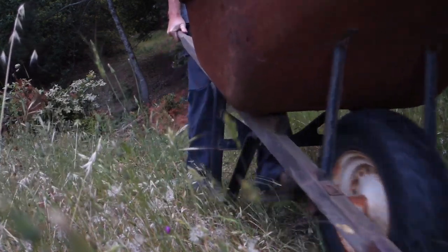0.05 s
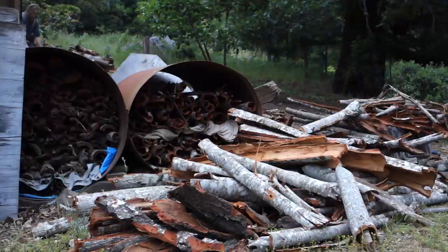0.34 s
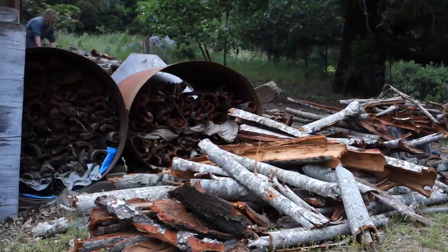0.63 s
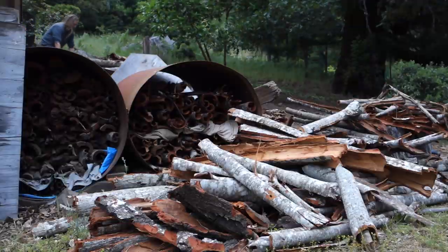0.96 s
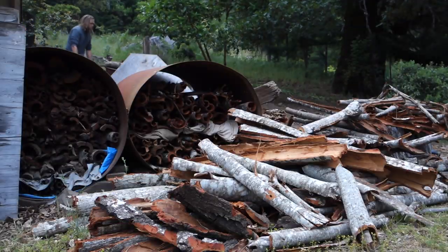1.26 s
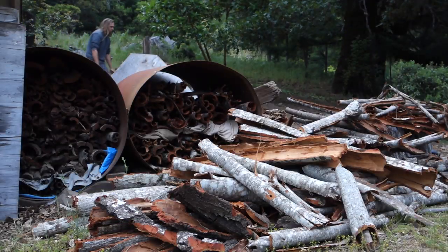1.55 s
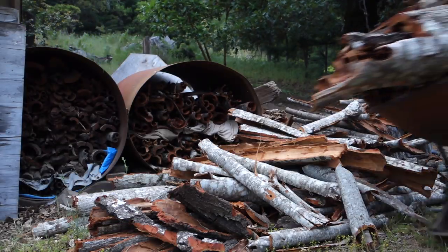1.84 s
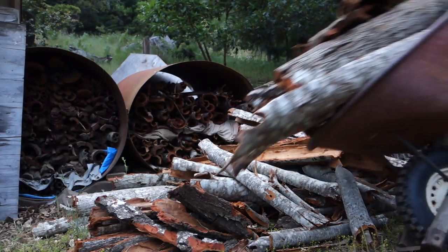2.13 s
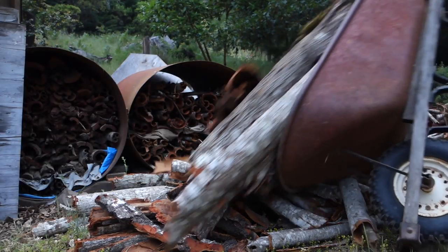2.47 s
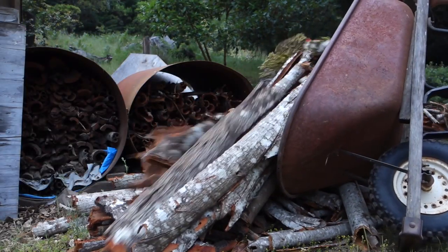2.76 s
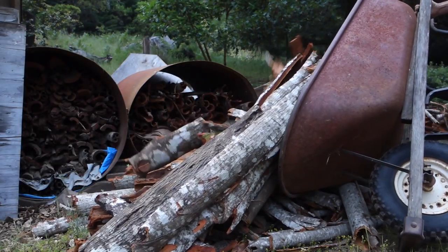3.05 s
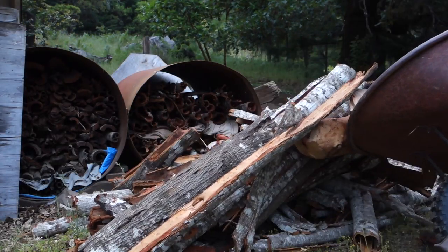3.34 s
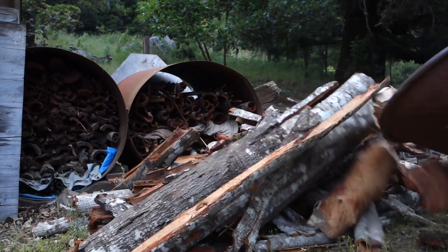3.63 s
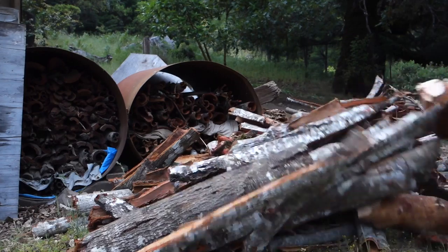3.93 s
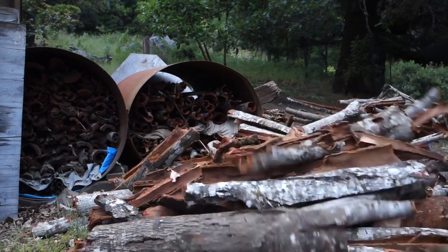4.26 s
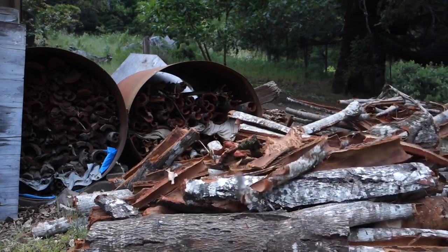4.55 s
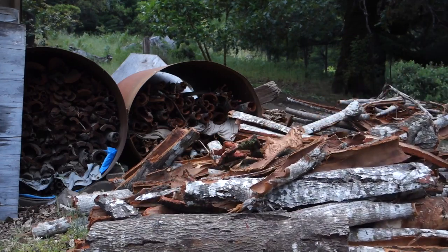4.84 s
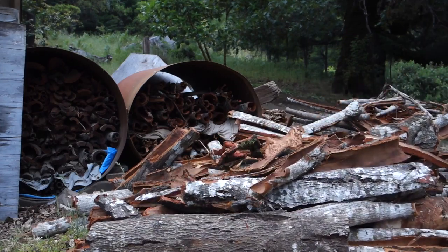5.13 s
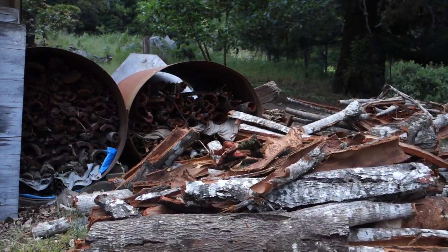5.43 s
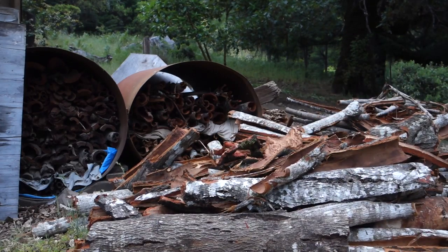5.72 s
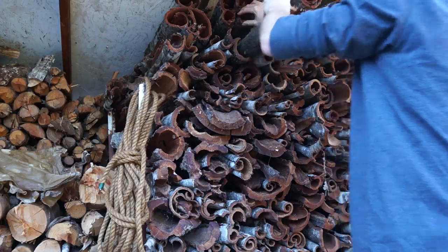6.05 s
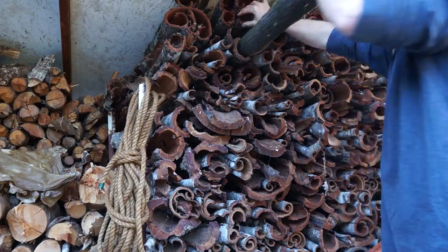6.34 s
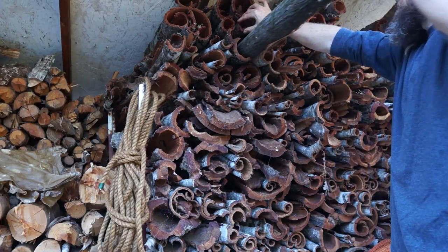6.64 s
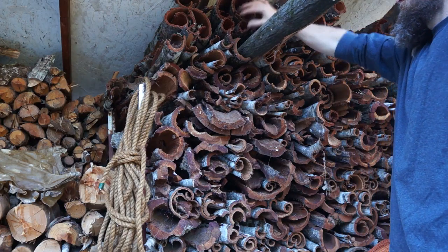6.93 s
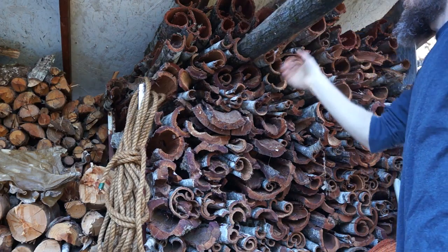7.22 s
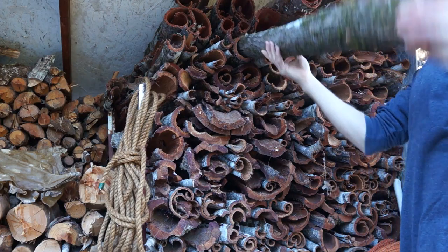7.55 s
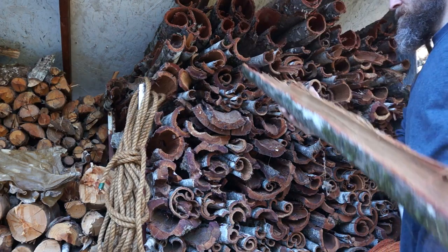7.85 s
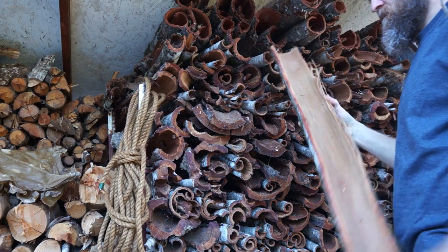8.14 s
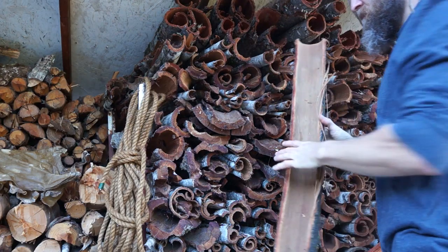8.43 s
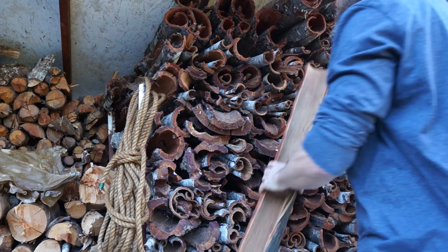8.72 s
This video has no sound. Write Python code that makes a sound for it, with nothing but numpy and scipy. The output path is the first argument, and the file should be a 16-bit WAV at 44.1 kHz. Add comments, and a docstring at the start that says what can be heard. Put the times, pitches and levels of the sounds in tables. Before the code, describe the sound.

A wheelbarrow rolls quietly through grass, jolting and squeaking, then dumps its load nearby: dry bark tumbles down with woody clacks, heavy thuds and a ringing rattle from the steel tray. After it settles, the place changes to a softly hissing shed. One hollow curl of bark sticks and slips as it is pulled from a stack in scraping tugs, and it ends with tiny snaps and hands brushing the bark.

```python
"""Tipping and pulling dry bark

A steel wheelbarrow bumps and squeaks over grass and tips a load of dry curled bark: slabs slide,
clatter and thud onto a pile, and the emptying tray drums and jingles. Then, in a hissing woodshed,
one long curl is dragged out of a stack of hollow ones, sticking and slipping, and hands brush it.
Scraping is made of many tiny slips; each blow is a short noise plus a few dying tones."""
import sys
import numpy as np
from scipy import signal
from scipy.fft import rfft, irfft, next_fast_len
from scipy.io import wavfile
from scipy.ndimage import uniform_filter1d, map_coordinates

SR = 44100
rng = np.random.default_rng(int(sys.argv[2]) if len(sys.argv) > 2 else 0)


def waveform_to_disk(signal):
    """Save audio, clipped to [-1, 1], as 16-bit WAV at the path in sys.argv[1]."""
    frames = np.transpose(np.atleast_2d(signal))
    scaled = np.clip(frames, -1, 1) * 32767
    samples = np.round(scaled).astype(np.int16)
    wavfile.write(sys.argv[1], SR, samples)


N = 391608

# dry edges clack, snap and slip: (time [s], relative level [dB], pitch [Hz])
EDGE_HITS = [(0.919, -28.5, 2770), (2.049, -21.5, 1420), (2.212, -25, 1690), (2.687, -6, 2000),
             (2.784, -4, 904), (2.817, -5, 3110), (2.851, -5.5, 950), (2.943, -0.5, 1850),
             (3.44, -17, 1080), (3.688, 1.5, 1073), (3.701, 1.5, 1063), (3.804, -4.5, 920),
             (3.915, -8, 1160), (3.945, -3.5, 1240), (4.002, -10, 1150), (4.091, -17, 940),
             (4.185, -1.5, 1070), (4.259, -10, 1176), (4.411, 1.5, 1018), (6.37, 4.5, 1490),
             (6.381, -2, 1410), (6.409, 1, 1105), (6.419, 3, 1543), (6.519, -1.5, 1940), (6.608, -8, 1750),
             (6.644, 1.5, 1880), (6.657, -1, 1170), (6.707, 2, 1910), (6.757, -5.5, 1290),
             (6.859, -1, 1220), (6.878, -5.5, 1197), (6.911, -3.5, 2730), (6.95, -8, 1233),
             (7.355, -8, 1300), (7.452, -10.5, 1750), (7.525, 4, 1354), (7.538, -0.5, 1610),
             (7.56, 0, 1580), (8.165, -17, 1380)]
# tones of the steel tray: (pitch [Hz], level [dB], fade time [s])
TRAY_TONES = [(120.4, 5, 0.25), (153.8, 4, 0.3), (204.7, 4, 0.3), (239.6, 7.5, 0.45), (289, -5, 0.41),
              (352, -14, 1.0), (443, -7, 0.3), (529, 3, 0.2), (643, -9, 0.25)]
# where the thin walls of a curl ring: (pitch [Hz], width [Hz], level [dB])
WALL_TONES = [(866, 57, 11), (1070, 62, -2), (1224, 100, 2), (1570, 98, 1), (1767, 43, 1.5), (1970, 48, 0),
              (2670, 71, -0.5), (3500, 890, -12)]
# tone colours of low rumbling, heavy slabs and crisp crackling: (frequency [Hz], level [dB])
RUMBLE_COLOUR = [(60, -37.5), (180, -4), (350, -5), (600, -1.5), (900, -13), (1500, -25), (4000, -59.5)]
SLAB_COLOUR = [(30, -23), (80, -10.5), (130, 5.5), (260, 3), (400, -1.5), (650, -7.5), (1200, -32.5),
               (3000, -46)]
CRACKLE_COLOUR = [(2000, -14), (5000, 4.5), (8500, 2.5), (12000, -1), (16000, -10.5)]


def amp(db):
    """Turn decibels into a number to multiply by."""
    return 10 ** (np.asarray(db) / 20)


def unit(x):
    """Scale a sound to an average strength (rms) of 1."""
    return x / np.sqrt(np.mean(x ** 2) + 1e-20)


def steady(x, size=3500):
    """Even out slow changes to a strength of 1, keeping the fine grain."""
    power = uniform_filter1d(uniform_filter1d(x ** 2, size), size)
    return x / np.sqrt(np.abs(power) + 1e-4 * np.mean(x ** 2))


def strike(x):
    """Scale a blow so that its loudest 3 ms have a strength of 1."""
    return x / np.sqrt(uniform_filter1d(x ** 2, 128).max() + 1e-20)


def add(track, s, sound):
    """Mix a sound into a track at s seconds."""
    start = max(0, round(s * SR))
    track[start:start + len(sound)] += sound[:N - start]


def wobble(rate):
    """A smooth random curve through rate points a second."""
    return map_coordinates(rng.standard_normal(int(N * rate / SR) + 4), [np.arange(N) * rate / SR])


def glide(times, values):
    """Join points with straight lines, one value per sample."""
    return np.interp(np.arange(N) / SR, times, values)


def during(times):
    """True from the first time to the last."""
    t = np.arange(N) / SR
    return (t >= times[0]) & (t <= times[-1])


def swells(starts, rises, holds, levels_db, t60):
    """Strength of overlapping movements: each rises, holds, then fades by 60 dB in t60 seconds."""
    power, t = np.zeros(N), np.arange(3 * SR // 2) / SR
    for s, rise, hold, db in np.broadcast(starts, rises, holds, levels_db):
        fading = amp(db - 60 * np.maximum(t - rise - hold, 0) / t60)
        add(power, s, (np.clip(t / rise, 0, 1) * fading) ** 2)
    return np.sqrt(power)


def ring_time():
    """Sample times for one blow: half a second."""
    return np.arange(SR // 2) / SR


def through(x, response):
    """Play x through an object, given the object's answer to one tap."""
    return signal.oaconvolve(x, response)[:len(x)]


def colour(x, spectrum, size=4096):
    """Filter x to follow (frequency [Hz], level [dB]) points."""
    hz, db = np.transpose(spectrum)
    gain = amp(np.interp(np.log(np.fft.rfftfreq(size, 1 / SR) + 1), np.log(hz), db))
    cepstrum = irfft(np.log(gain))
    cepstrum[1:size // 2] *= 2  # folded so the filter rings only after a sound, never before
    cepstrum[size // 2 + 1:] = 0
    return through(x, irfft(np.exp(rfft(cepstrum))))


def hump(hz, below_db, above_db):
    """A tone colour that peaks at hz, with the given levels two octaves below and above."""
    return [(hz / 16, 3 * below_db), (hz / 4, below_db), (hz, 0),
            (hz * 4, above_db), (hz * 32, 3 * above_db)]


def resonator(peaks):
    """How an object answers one tap: the wider a peak, the sooner its tone dies."""
    t = ring_time()
    return sum(amp(db) * width * np.exp(-np.pi * width * t) * np.sin(2 * np.pi * hz * t)
               for hz, width, db in peaks)


def ring(tones):
    """A blow sets off dying tones, each with a slightly random strength."""
    t = ring_time()
    return sum(rng.choice([-1, 1]) * amp(db + rng.normal(0, 3) - 60 * t / t60)
               * np.sin(2 * np.pi * hz * t) for hz, db, t60 in tones)


def burst(t60):
    """Dying noise: the many crowded tones of an uneven piece."""
    t = ring_time()
    return rng.standard_normal(len(t)) * amp(-60 * t / t60)


def pieces(x, patchy_db):
    """As the contact passes from piece to piece, narrow bands of sound come and go."""
    bands = signal.stft(x, nperseg=512)[2]
    patches = uniform_filter1d(rng.standard_normal(bands.shape), size=2, axis=0)  # blur in pitch
    patches = uniform_filter1d(patches, size=22, axis=1)  # blur in time
    return signal.istft(bands * amp(patchy_db * unit(patches)), nperseg=512)[1][:N]


def friction(spectrum, rate, spread_db, t60, jerk_db, jerk_rate, patchy_db=4.0):
    """Rubbing: rate tiny slips a second, uneven in size and coming in jerks, each ringing briefly."""
    slips = rng.random(N) < rate / SR
    sizes = amp(spread_db * np.clip(rng.standard_normal(N), -2, 2) + jerk_db * wobble(jerk_rate))
    energy = signal.lfilter([1], [1, -amp(-60 / t60 / SR) ** 2], slips * sizes ** 2)
    grains = pieces(np.sqrt(energy) * rng.standard_normal(N), patchy_db)
    return steady(colour(grains, spectrum), size=2200)


def sweep(x, centre_hz, boost_db):
    """Lift a broad band of sound that follows the moving contact."""
    hz, s, bands = signal.stft(x, SR, nperseg=256)
    centre = np.interp(s * SR, np.arange(N), centre_hz)
    octaves_away = np.log2((hz[:, None] + 1) / centre)
    bands = bands * amp(boost_db * np.exp(-octaves_away ** 2))
    return steady(signal.istft(bands, SR, nperseg=256)[1][:N], size=2200)


def lull(depth_db, hold):
    """Just before each clack the piece is stuck or in the air, so its scraping dips."""
    t, waiting = np.arange(N) / SR, np.zeros(N)
    for s, _, _ in EDGE_HITS:
        waiting[np.searchsorted(t, s - hold):np.searchsorted(t, s)] = 1
    return amp(-depth_db * uniform_filter1d(waiting, size=128))


def air(spectrum, side):
    """Steady air, alike in both ears in the bass and wider in the treble."""
    middle, wide = (unit(colour(rng.standard_normal(N), spectrum)) for channel in range(2))
    wide = colour(wide, side)
    return np.array([middle + wide, middle - wide])


def rolling():
    """The tray rumbles as the barrow jolts along, and the tyre parts the grass."""
    # how hard the barrow jolts: (time [s], relative level [dB])
    jolting = [(0, -24.5), (0.14, -40.5), (0.33, -39.5), (0.62, -55), (1.1, -55), (1.32, -46),
               (1.64, -43.5), (1.8, -48), (2.06, -39)]
    # tufts of grass: (start [s], rise [s], hold [s], level [dB], pitch [Hz])
    tufts = [(0, .005, 0.056, -40.5, 1200), (0.08, .02, .11, -44.5, 2210), (0.317, .02, 0.035, -47, 1640),
             (0.884, .04, 0.023, -42, 2530), (0.998, .02, 0.024, -46.5, 3500),
             (1.14, .13, 0.15, -42.5, 1790)]
    # tone colour of grass: (frequency [Hz], level [dB])
    grass_colour = [(300, -10), (800, -3), (2600, -4.5), (5000, -10.5), (9000, -16), (16000, -20.5)]
    times, jolt_db = np.transpose(jolting)
    jolts = amp(glide(times, jolt_db))
    s, rise, hold, db, hz = np.transpose(tufts)
    rumble = friction(RUMBLE_COLOUR, rate=310, spread_db=0.5, t60=0.043, jerk_db=3, jerk_rate=34)
    grass = friction(grass_colour, rate=3000, spread_db=4, t60=0.025, jerk_db=1.8, jerk_rate=38,
                     patchy_db=2.2)
    grass = sweep(grass, glide(s + rise, hz), boost_db=3.5)
    swish = amp(-6.5) * jolts + swells(s, rise, hold, db, t60=0.57)
    return (amp(1.5) * jolts * rumble + swish * grass) * during(times)


def thuds():
    """A landing slab booms at its own pitch, shakes the pile and sets the tray humming."""
    # slabs land or hit the tray: (time [s], relative level [dB], pitch [Hz])
    landings = [(0.083, -24, 185), (0.45, -21.5, 149), (2.099, -9.5, 124), (2.27, -3.5, 258.8),
                (2.783, 1, 291), (2.796, -5, 190.4), (3.08, -6, 266), (3.109, -9.5, 144), (3.442, -3, 145),
                (3.469, -3.5, 132), (3.572, -3, 128), (3.611, -16, 123), (3.915, -5.5, 180),
                (4.16, -3.5, 240.5), (4.412, -8.5, 168), (4.46, -7.5, 129), (4.799, -3, 183),
                (4.879, -5.5, 197), (5.458, -20, 324)]
    x, t = np.zeros(N), ring_time()
    for s, db, hz in landings:
        boom = np.sin(2 * np.pi * hz * t) * amp(-60 * t / 0.32)
        boom += 0.18 * ring([(1.9 * hz, 0, 0.13), (2.8 * hz, -3, 0.09)])
        pile = strike(colour(burst(0.26), hump(hz, -12.5, -18)))
        tray = strike(ring(TRAY_TONES))
        add(x, s, amp(db - 6.5) * strike(boom + pile + 0.67 * tray))
    return x


def knocks():
    """A hollow piece answers a blunt blow with a few close, quickly dying tones."""
    # blows on hollow bark: (time [s], level [dB], pitch [Hz])
    blows = [(0.086, -23, 330), (2.51, -29, 720), (2.68, -14, 520), (3.438, -11.5, 794), (4.187, -18, 718),
             (4.411, -21, 656), (6.736, -18, 205), (7.077, -16.5, 375)]
    x = np.zeros(N)
    for s, db, hz in blows:
        tube = ring([(0.66 * hz, -5, 0.11), (hz, 0, 0.11), (1.13 * hz, -3, 0.1),
                     (1.52 * hz, -4, 0.09), (1.9 * hz, -9, 0.07)])
        blow = strike(colour(burst(0.04), hump(hz, -12, -20)))
        add(x, s, amp(db) * strike(strike(tube) + 0.64 * blow))
    return x


def axle_squeak():
    """The axle gives one thin, wavering tone that rises and falls."""
    # course of the squeak: (time [s], pitch [Hz], level [dB])
    squeak = [(.115, 2280, -50), (.128, 2950, -42), (.155, 3680, -44), (.185, 3430, -42), (.215, 3100, -53)]
    s, hz, db = np.transpose(squeak)
    pitch = glide(s, hz) * (1 + 0.012 * wobble(380))
    return during(s) * amp(glide(s, db)) * np.sin(2 * np.pi * np.cumsum(pitch) / SR)


def bumps():
    """The ground takes the barrow's weight with a few slow swings."""
    # wheel and frame meet the ground: (time [s], relative level [dB], pitch [Hz])
    ground_hits = [(0.208, -15, 82.5), (0.239, -19.5, 97), (0.358, -22.5, 68), (0.569, -26.5, 83.4),
                   (0.782, -43, 118), (1.027, -21.5, 86), (1.312, -22.5, 79.5), (1.388, -25, 71.6),
                   (1.894, -28, 100), (1.946, -19, 75), (2.25, -10, 90), (3.199, -11.5, 100),
                   (3.257, -14, 53), (3.357, -6, 121), (3.386, -8, 129), (3.872, -10, 90.5),
                   (4.651, -6.5, 143)]
    x, t = np.zeros(N), ring_time()
    for s, db, hz in ground_hits:
        push = np.sin(2 * np.pi * hz * t) * amp(-60 * t / 0.055) * (1 - np.exp(-t / 0.013))
        earth = colour(burst(0.23), hump(hz, -11.5, -26.5))
        add(x, s, amp(db - 6) * strike(strike(push) + 1.1 * strike(earth)))
    return x


def clacks(t60=0.12):
    """A dry edge gives a sharp crack and a short woody ring."""
    x = np.zeros(N)
    for s, db, hz in EDGE_HITS:
        crack = colour(burst(0.03) + 0.67 * burst(t60), hump(hz, -12, -19.5))
        wood = ring([(0.63 * hz, -4, t60), (hz, 0, t60),
                     (1.55 * hz, -3, 0.49 * t60), (2.3 * hz, -7, 0.5 * t60)])
        add(x, s, amp(db - 13) * strike(strike(crack) + 0.6 * strike(wood)))
    return x


def wheel_squeals():
    """The wheel rings shrilly at one pitch and the octave above."""
    # each squeal: (time [s], pitch [Hz], level [dB], fade time [s])
    squeals = [(1.008, 5500, -37.5, 0.32), (1.268, 4760, -42, .2)]
    x = np.zeros(N)
    for s, hz, db, t60 in squeals:
        wheel = resonator([(hz, 70, 0), (2 * hz, 100, -4)])
        add(x, s, amp(db) * strike(through(burst(t60), wheel)))
    return x


def tipping():
    """Slabs rumble against each other, curls scrape over them and crumbs trickle."""
    # parts of the load slide off: (start [s], rise [s], hold [s], slabs [dB], curls [dB], crumbs [dB])
    slides = [(2.061, 0.046, 0.022, -19, -21.5, -35), (2.21, .003, 0.017, -20.5, -25, -34),
              (2.235, 0.027, 0.13, -23.5, -21, -43), (2.283, 0.2, 0.12, -14, -13.5, -21.5),
              (2.606, 0.045, 0.23, -21, -23.5, -33), (2.932, 0.0036, 0.01, -41, -33.5, -32.5),
              (3.07, 0.015, 0.58, -32.5, -38, -45.5), (3.422, 0.021, 0.053, -17, -26, -69),
              (3.538, 0.032, 0.037, -13, -22.5, -49), (3.678, 0.0085, 0.011, -23, -31, -34),
              (3.786, 0.011, 0.063, -23, -24, -37.5), (3.952, 0.044, 0.12, -17.5, -20.5, -33),
              (4.174, 0.0046, 0.014, -22, -18, -36), (4.228, 0.012, 0.067, -16.5, -22, -33),
              (4.378, 0.0059, 0.21, -21, -26, -36), (4.71, 0.085, 0.12, -22, -28, -42),
              (5.44, 0.018, 0.014, -29.5, -55, -75), (5.544, 0.04, 0.15, -44, -49.5, -63)]
    # tone colours of light curls and of crumbs: (frequency [Hz], level [dB])
    curl_colour = [(200, -23.5), (450, 1), (700, 1.5), (1300, -1.5), (2200, -8), (3300, -20), (6000, -31.5),
                   (16000, -44)]
    crumb_colour = [(1000, -27), (2800, 9), (4500, -1.5), (7000, -4), (10000, -11.5), (16000, -7.5)]
    s, rise, hold, slab_db, curl_db, crumb_db = np.transpose(slides)
    slabs = friction(SLAB_COLOUR, rate=150, spread_db=-4, t60=0.23, jerk_db=4, jerk_rate=28)
    curls = friction(curl_colour, rate=260, spread_db=1.5, t60=0.085, jerk_db=1.3, jerk_rate=40,
                     patchy_db=3.5)
    crumbs = friction(crumb_colour, rate=780, spread_db=5, t60=0.054, jerk_db=3, jerk_rate=14)
    slabs *= swells(s, rise, hold, slab_db, t60=0.86)
    curls *= swells(s, rise, hold, curl_db, t60=0.69)
    crumbs *= swells(s, rise, hold, crumb_db, t60=0.63)
    return slabs + (curls + crumbs) * lull(depth_db=1, hold=0.031)


def rim_pings():
    """The struck steel rim clicks and rings brightly."""
    # blows on the rim: (time [s], relative level [dB])
    blows = [(2.0854, -14), (3.914, -17.5), (3.9419, -44), (4, -12), (4.1784, -21), (4.4134, -23)]
    # tones of the rim: (pitch [Hz], level [dB], fade time [s])
    rim_tones = [(3180, 0, 0.14), (4250, 17, 0.027), (5090, 4, 0.13), (5860, -12, .08), (6730, 3, 0.097),
                 (8520, -10, 0.15), (10900, -2, 0.071), (13740, -7, 0.03), (14750, -4.5, .1)]
    x = np.zeros(N)
    for s, db in blows:
        click = strike(colour(burst(0.03), hump(5500, -18, -14)))
        add(x, s, amp(db - 5.5) * strike(strike(ring(rim_tones)) + click))
    return x


def fibre_snaps():
    """Fine fibres break with tiny, high ticks."""
    # each break: (time [s], relative level [dB])
    breaks = [(2.2104, -16.5), (2.7844, -16.5), (3.6097, -22), (3.6586, -23), (3.701, -13), (4.367, -21),
              (6.174, -15), (6.8354, -24), (7.0584, -22), (7.1015, -25), (7.331, -23.5), (7.8965, -19),
              (7.9394, -9.5), (7.9838, -17), (8.0366, -30), (8.1915, -10.5)]
    x = np.zeros(N)
    for s, db in breaks:
        snap = colour(burst(0.009) + 0.2 * burst(0.03), hump(8800, -24, -50))
        add(x, s, amp(db - 10) * strike(snap))
    return x


def shaking(rise=0.0084, hold=0.014):
    """The emptying tray drums at its own pitches and its loose steel jingles."""
    # jolts of the tray: (time [s], drumming [dB], jingling [dB])
    jolts = [(4.0, -20, -39), (4.19, -39, -36), (4.41, -16.5, -37), (4.49, -19, -42), (4.635, -19, -36.5),
             (4.765, -19, -33), (4.84, -17.5, -34.5), (4.925, -31, -41)]
    # where the loose steel rings: (pitch [Hz], width [Hz], level [dB])
    steel_tones = [(12300, 400, -14), (12500, 400, -13), (13450, 300, 0), (13750, 450, -9), (14900, 330, 6)]
    s, drum_db, jingle_db = np.transpose(jolts)
    shudder = friction(SLAB_COLOUR, rate=220, spread_db=-2, t60=0.0049, jerk_db=5, jerk_rate=18)
    chatter = friction(CRACKLE_COLOUR, rate=710, spread_db=5.5, t60=0.028, jerk_db=5, jerk_rate=9.2)
    drum = steady(through(shudder, ring(TRAY_TONES)))
    jingle = steady(through(chatter, resonator(steel_tones)))
    drum *= swells(s, rise, hold, drum_db, t60=0.97)
    jingle *= swells(s, rise, hold, jingle_db, t60=0.45)
    return drum + jingle


def pulling():
    """The curl sticks and slips: its ridges rasp, its walls and hollow answer, flakes crackle off."""
    # tugs on the curl: (start [s], rise [s], hold [s], rasp [dB], pitch [Hz], flakes [dB])
    tugs = [(5.91, .005, 0.15, -41.5, 1290, -48.5), (6.045, 0.066, 0.06, -17.5, 1420, -30),
            (6.155, 0.034, .14, -14.5, 990, -35.5), (6.363, 0.006, 0.016, -18, 1300, -30),
            (6.388, 0.021, 0.023, -14, 1730, -31.5), (6.508, .005, 0.066, -17.5, 1320, -41),
            (6.593, 0.0093, 0.11, -19.5, 1670, -35.5), (6.75, .004, 0.076, -24, 1460, -38.5),
            (6.847, 0.0065, 0.017, -21, 1260, -51), (6.909, 0.0035, 0.045, -23.5, 2200, -40),
            (7.067, 0.0069, 0.023, -35, 810, -48), (7.142, 0.084, 0.16, -25.5, 1260, -44),
            (7.426, 0.061, 0.043, -21, 1290, -40), (7.502, .015, 0.032, -21.5, 1890, -28.5),
            (7.586, 0.028, 0.027, -20, 2520, -34.5), (7.743, .03, 0.17, -44, 1200, -45.5),
            (7.892, 0.05, 0.052, -35.5, 900, -38), (8.808, 0.044, .03, -44, 1630, -50)]
    # where the hollow rings: (pitch [Hz], width [Hz], level [dB])
    hollow_tones = [(188, 60, 1.5), (388, 70, 5), (499, 34, -2.5), (573, 58, -3.5), (690, 39, -0.5),
                    (950, 54, 11)]
    s, rise, hold, rasp_db, hz, flake_db = np.transpose(tugs)
    hollow_db = rasp_db - 6 + np.log2(1440 / hz)  # duller tugs sound it more, 1 dB an octave
    rasp_colour = [(200, -14), (450, -12), (850, -0.5), (1500, 0), (2100, 1.5), (2800, -1.5), (3600, -1),
                   (5000, -10), (8000, -18), (16000, -39.5)]  # tone colour of the ridges: (frequency [Hz], level [dB])
    rasp = friction(rasp_colour, rate=930, spread_db=6, t60=0.048, jerk_db=1.6, jerk_rate=70,
                    patchy_db=3.5)
    walls = steady(through(rasp, resonator(WALL_TONES)))
    rasp = sweep(steady(rasp + 0.33 * walls), glide(s + rise + hold / 2, hz), boost_db=6.5)
    rub = friction(RUMBLE_COLOUR, rate=490, spread_db=-0.5, t60=0.015, jerk_db=-1.5, jerk_rate=60)
    hollow = steady(through(rub, resonator(hollow_tones))) + amp(-26) * rub
    flakes = friction(CRACKLE_COLOUR, rate=920, spread_db=-0.5, t60=0.016, jerk_db=0.5, jerk_rate=70)
    rasp *= swells(s, rise, hold, rasp_db, t60=0.33)
    hollow *= swells(s, rise, hold, hollow_db, t60=0.33)
    flakes *= swells(s, rise, hold, flake_db, t60=0.47)
    return (rasp + hollow + flakes) * lull(depth_db=3, hold=0.018)


def brushes():
    """A quick stroke over the ridges swells and fades, sounding the walls of the curl."""
    # hands brush the curl: (time [s], half length [s], level [dB], pitch [Hz])
    strokes = [(8.23, 0.021, -21.5, 1240), (8.536, 0.029, -29.5, 2230)]
    x, t = np.zeros(N), ring_time()
    middle = t.mean()
    for s, half_length, db, hz in strokes:
        grain = unit(colour(rng.standard_normal(len(t)), hump(hz, -13, -15)))
        walls = unit(through(grain, resonator(WALL_TONES)))
        swell = np.exp(-2 * ((t - middle) / half_length) ** 2)
        add(x, s - middle, amp(db) * unit(grain + 0.28 * walls) * swell)
    return x


def scatter(x, t60, size=256):
    """Each short stretch of x comes back as a new cluster of weak echoes."""
    starts = np.arange(0, N, size // 2)
    stretches = np.pad(x, (0, size))[starts[:, None] + np.arange(size)] * np.sqrt(np.hanning(size))
    t = np.arange(SR // 64) / SR
    echoes = rng.standard_normal((len(starts), len(t))) * amp(-60 * t / t60)
    echoes /= np.linalg.norm(echoes, axis=1, keepdims=True)
    out = np.zeros(N)
    for start, sound in zip(starts, signal.fftconvolve(stretches, echoes, axes=1)):
        add(out, start / SR, sound)
    return out


def place(x, lean, side, t60):
    """Share a sound between left and right, with echoes off the wood around it."""
    wide = colour(scatter(x, t60), side)
    left = colour(x + wide, [(hz, db / 2) for hz, db in lean])
    right = colour(x - wide, [(hz, -db / 2) for hz, db in lean])
    return np.array([left, right])


def scene(shed_start_s=5.925):
    """First the open yard, then the shed."""
    # tone colour of the air in each place: (frequency [Hz], relative level [dB])
    yard_air = [(15, -46), (25, 0.5), (152, 5.5), (299, -17.5), (637, -18), (1090, -25), (1680, -23),
                (8490, -32), (14600, -27.5), (15800, -34)]
    shed_air = [(15, -32), (25, -7), (49, -3), (70, -3.5), (126, 3), (179, -7.5), (382, -7), (557, -17),
                (857, -21.5), (981, -19.5), (1090, -23), (1590, -22.5), (8970, -27.5), (15800, -29.5)]
    # direction of the pile and the stack: (frequency [Hz], left minus right [dB])
    pile_lean = [(60, -3.5), (180, -1.0), (550, -2.0), (1650, -4), (4970, -13.5), (15000, -1.5)]
    stack_lean = [(60, -0.92), (240, 0.088), (950, -2.3), (3770, -0.47), (15000, -0.99)]
    # echoes from the sides: (frequency [Hz], level [dB])
    barrow_echo = [(30, -15), (60, -10), (240, -19), (950, -11), (3770, -3.5), (15000, 0)]
    pile_echo = [(100, -15), (500, -23.5), (2000, -16), (5000, -2.5), (14000, -2.5)]
    stack_echo = [(60, -34), (180, -29), (550, -17.5), (1650, -19.5), (4970, -53), (15000, -63)]
    clatter = clacks() + fibre_snaps() + knocks()  # heard in both places
    barrow = rolling() + axle_squeak() + wheel_squeals() + bumps()
    barrow = place(barrow, [(1000, 0)], barrow_echo, t60=0.021)  # straight ahead
    load = tipping() + shaking() + thuds() + rim_pings() + clatter
    load = place(load, pile_lean, pile_echo, t60=0.017)
    load[0] = np.pad(load[0], (1, 0))[:N]  # reaches the left ear one sample late
    stack = place(pulling() + brushes() + clatter, stack_lean, stack_echo, t60=0.037)
    yard = barrow + load + amp(-44.5) * air(yard_air, side=[(100, -36), (1000, 4.5), (8000, -0.5)])
    shed = stack + amp(-40) * air(shed_air, side=[(100, -30), (1000, -2.5), (8000, -17)])
    return np.where(np.arange(N) / SR >= shed_start_s, shed, yard)


def record(dry, top_hz=15950):
    """Round off the loudest peaks and cut the very highest treble."""
    rounded = dry / (1 + np.abs(dry) ** 8) ** (1 / 8)
    size = next_fast_len(N + SR // 2)
    kept = np.fft.rfftfreq(size, 1 / SR) < top_hz
    return irfft(rfft(rounded, size) * kept, size)[:, :N]


dry = scene()
out = record(dry)
waveform_to_disk(out)
```